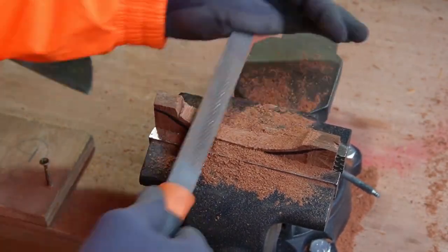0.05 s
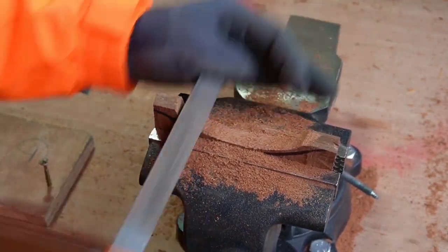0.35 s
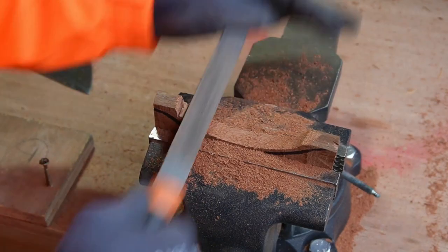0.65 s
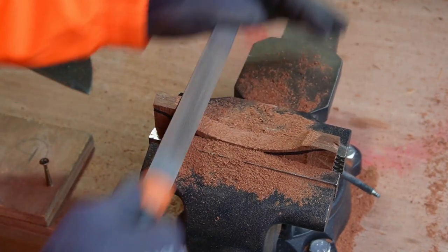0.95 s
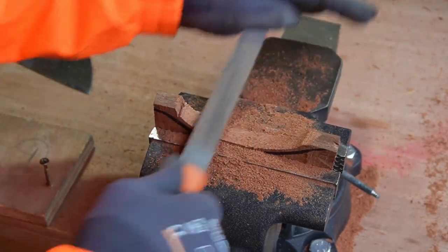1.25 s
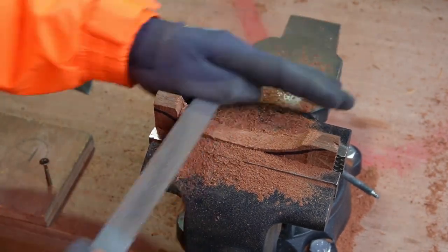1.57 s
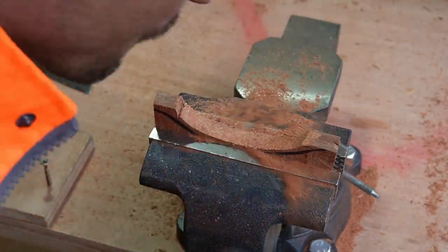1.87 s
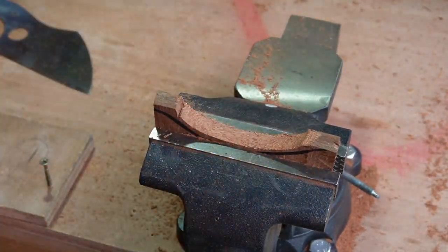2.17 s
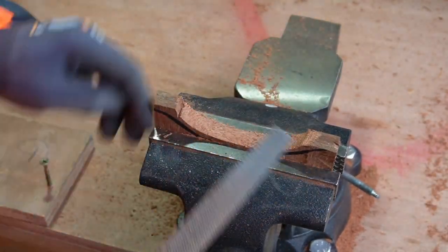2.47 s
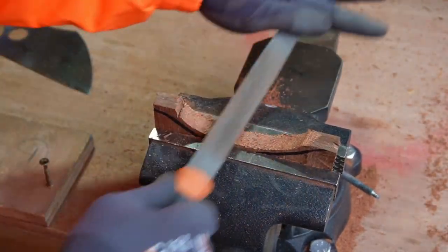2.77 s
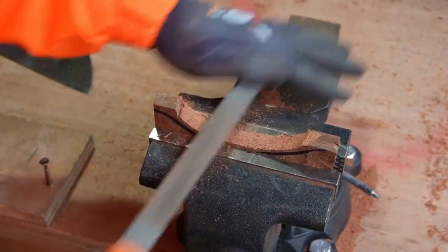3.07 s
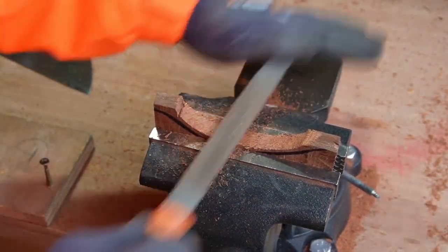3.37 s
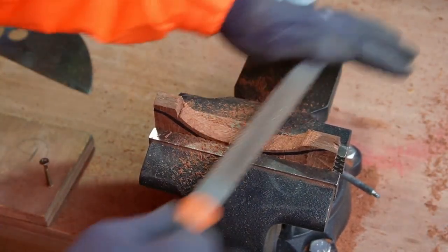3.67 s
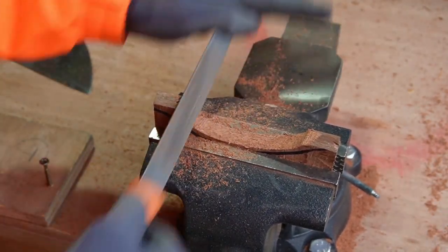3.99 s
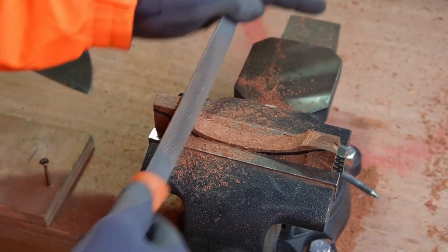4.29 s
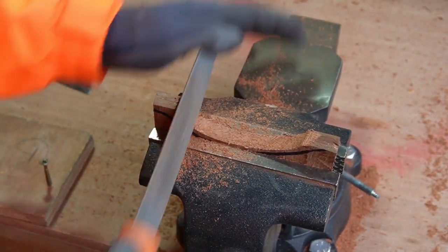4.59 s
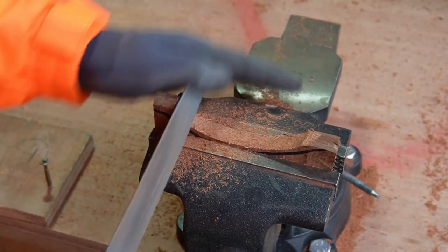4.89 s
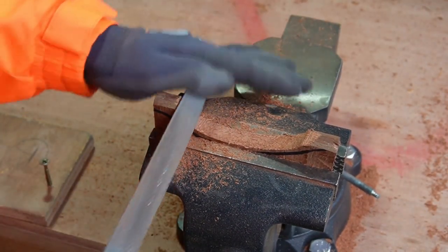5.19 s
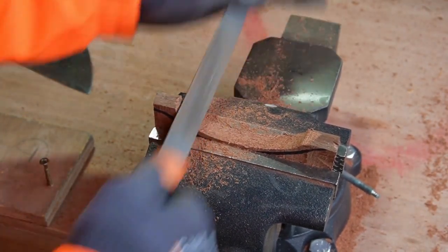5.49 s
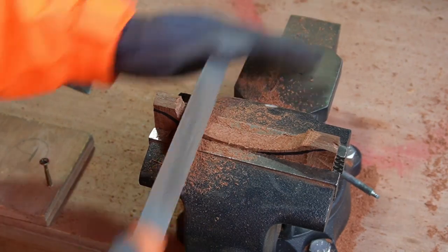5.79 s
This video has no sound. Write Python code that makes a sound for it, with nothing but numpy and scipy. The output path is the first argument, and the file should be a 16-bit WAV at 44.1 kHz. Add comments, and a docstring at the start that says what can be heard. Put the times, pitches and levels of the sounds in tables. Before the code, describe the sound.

A steel file rasps rapidly back and forth over a piece of wood clamped in a vise. The pushes are loud and bright, the draws softer and duller, with a faint metallic ring. The filing stops for about a second, while a hand brush softly sweeps the vise and sleeves rustle. Then the rasping resumes, lighter at first and soon at full strength. It is heard close up in a small, quiet workshop.

```python
"""A fast, dry rasp of a steel file, to and fro over a wooden handle clamped in a vise. Each stroke is a swell
of tooth clicks that rings file, wood and vise; pushes are loud and bright, draws softer and duller. The blade
sings faintly and the bench bumps under the worker's weight. In a pause a hand brush sweeps the dust off the
vise and clothes rustle; then the filing resumes. Behind it all lies the still air of a small workshop."""
import sys
import numpy as np
from scipy import signal
from scipy.fft import rfft, irfft
from scipy.io import wavfile
from scipy.ndimage import uniform_filter1d

SR = 44100
rng = np.random.default_rng(int(sys.argv[2]) if len(sys.argv) > 2 else 0)


def digitize_waveform(pressure):
    """Quantize a signal to 16-bit integers and store it at the path in sys.argv[1].

    Rows of a 2-D input are taken as channels; values are limited to [-1, 1].
    """
    field = np.atleast_2d(pressure).T
    bounded = np.clip(field, -1, 1)
    quanta = np.round(bounded * 32767).astype(np.int16)
    wavfile.write(sys.argv[1], SR, quanta)


N = 266805
TIME = np.arange(N) / SR
STROKE_SAMPLES = 8192
STROKE_HZ = np.arange(STROKE_SAMPLES // 2 + 1) * SR / STROKE_SAMPLES + 1e-3

# runs of filing at an even tempo: first_push_s, last_push_s, push_count
FILING_RUNS = [(.008, 1.147, 14), (1.297, 1.649, 5), (2.699, 2.988, 4), (3.077, 3.686, 8), (3.78, 4.406, 8),
               (4.502, 5.182, 8), (5.276, 5.632, 5), (5.719, 6.064, 5)]
# effort of the arm: time_s, push_db, draw_db
ARM_EFFORT = [(0, -23.5, -35.5), (.6, -24.5, -34.5), (.94, -23, -34.5), (1.08, -21.5, -29),
              (1.15, -32.5, -30.5), (1.3, -26.8, -36.5), (1.52, -26, -36.5), (1.649, -30, -45),
              (2.7, -32, -40.5), (2.94, -30.7, -37), (3.25, -34, -45), (3.7, -39, -46),
              (3.81, -27.5, -33.5), (4.35, -22.5, -29), (4.85, -23.5, -26), (5.22, -21, -26),
              (5.32, -22, -36), (5.971, -22, -30.5), (6.04, -56, -42.5)]
# strokes that dig in or skid: time_s, extra_level_db, extra_knock_db
STROKE_ACCENTS = [(.18, -5, 0), (.36, -4.5, -1.5), (.533, -1.5, 5.5), (.757, 1.5, 6.5), (.8, -4, 1.5),
                  (.885, 0, -4.5), (1.02, 4.5, -4), (2.7, 0.5, -9), (3.34, -5.5, 5), (3.39, -7, 0),
                  (3.83, 5, 1.5), (4.23, 2, -2), (4.6, -1.5, -2), (4.32, -1.5, 13.5), (4.37, -2, 8),
                  (4.79, 4, -2), (4.985, 0, 0.5), (5.275, -5, 1), (5.455, -3, -5), (5.72, -3.5, -1.5),
                  (5.805, 0.5, 0.5), (5.935, -5.5, -1)]
# bite of the teeth as the file changes angle: time_s, sizzle_db, dust_hiss_db, ring_db, ring_hz
TOOTH_BITE = [(0, -1, 2.5, 3, 1300), (.45, 1, 0.9, 2, 1325), (1.1, -1.2, 2, 2.5, 1350),
              (1.3, 4, -2, 1, 1330), (1.65, 2, 4, 1.5, 1516), (2.719, 4, 2.5, -7.5, 1640),
              (2.95, 1.5, 1.5, -0.5, 1630), (3.35, 6, 7, -2, 1590), (3.68, 2.7, 5.5, -2.5, 1740),
              (3.87, -2, 3.5, 4.5, 1310), (4.2, -2, 1, 6.5, 1330), (4.7, -4, 0, 4, 1386),
              (5.05, -1, -0.3, 0.5, 1520), (5.25, -3, 0.5, 1.5, 1250), (5.68, -0.5, -3, -2.5, 1210),
              (6.0, 0.5, -2, 1.5, 1380)]
# broad colour of teeth tearing wood: frequency_hz, level_db
RASP_COLOUR = [(50, -38.5), (130, -27.5), (250, -28.5), (400, -24), (640, -17), (1000, -3.5), (1900, -11.5),
               (3200, -1), (4400, 0), (5500, -8.5), (7000, -9), (9500, -15.5), (12000, -25), (15000, -35)]
# resonances of handle, vise and file: pitch_hz, width_hz, peak_db
WORK_MODES = [(361.5, 46, 18.5), (494.5, 25, 12.5), (934, 22, 6.5), (1054, 21, 5), (1187, 25, 5),
              (1316.4, 37.5, 17.5), (1581, 63, 11), (1756, 43, 6.5), (1866, 230, 9), (2080, 58, 5),
              (2224, 49, 9.5), (2395, 173, 4.5), (2625, 80, 16), (2859, 54, 12), (3152, 41, 6),
              (3580, 24, 1), (4102, 130, 3.5), (4258, 40, 6.5), (4580, 180, 5.5), (5000, 400, 4),
              (5880, 91, 6.5), (6300, 78, 11), (6630, 54, 12), (7314, 75, 5)]
# phase scatter between the ears: frequency_hz, scatter_rad
STEREO_SCATTER = [(140, 1.12), (280, 2.59), (2000, 4.12), (10000, 4.15)]
# how freely the grip lets the blade sing, relative to the strokes: time_s, ring_db
BLADE_SUSTAIN = [(.2, -20), (.4, -1), (.6, -46), (.95, -5.5), (1.42, -12), (1.64, -31), (2.67, -31),
                 (2.8, -1.5), (3.1, -13.5), (3.45, -3), (3.7, -32), (3.97, -4), (4.25, -25), (4.48, -8),
                 (4.8, -5.5), (5.15, -33), (5.62, -5.5), (6, -15)]
# two sweeps of the brush: peak_s, half_width_s, level_db
BRUSH_SWEEPS = [(1.985, 0.027, -48), (2.137, 0.017, -47.5)]
# colour of the bristle hiss: frequency_hz, level_db
BRISTLE_COLOUR = [(120, -77), (200, -45), (345, -37), (783, -14), (1210, -23), (1680, -5), (2210, -9),
                  (3070, -3), (3890, -6), (4410, -4.5), (6830, -13), (8820, -15), (15500, -33)]
# hollow note of the bristles in the long sweep: time_s, pitch_hz, level_db
HOLLOW_NOTE = [(1.9, 560, -100), (1.94, 625, -70), (1.965, 788, -55.5), (1.985, 772, -68),
               (2.005, 690, -67), (2.03, 600, -83)]
# swell of the bristles first grazing the vise, and of the file's faint steel ring: time_s, level_db
GRAZE_SWELL = [(1.82, -95), (1.845, -67.5), (1.91, -65.5), (1.96, -60.5), (1.995, -53), (2.03, -86),
               (2.07, -103)]
# faint ring of the file's steel as it slides and is laid down: pitch_hz, level_db
STEEL_MODES = [(1750, -12), (2760, 0.5), (3040, -5), (5235, -3.5)]
# bumps of the bench: peak_s, level_db
BENCH_BUMPS = [(.77, -80), (.848, -73), (1.3, -79), (2.765, -74), (3.92, -76), (4.1, -71), (4.15, -73),
               (4.68, -83), (4.842, -76), (4.94, -78), (5.63, -70), (5.987, -84)]
# dull colour of those bumps: frequency_hz, level_db
BENCH_COLOUR = [(20, -24.5), (55, -16), (85, -4), (140, 5.5), (220, -3.5), (400, -30.0), (1000, -81.0)]
# sleeves and gloves moving, the last swell blending into the first draw of the new run: peak_s, half_width_s,
# level_db
CLOTH_MOVES = [(1.68, 0.079, -63), (1.92, 0.12, -69.5), (2.26, 0.11, -74), (2.41, .018, -85.5),
               (2.56, 0.03, -63), (2.645, 0.044, -67)]
# colour of rubbing cloth: frequency_hz, level_db
CLOTH_COLOUR = [(47, -58), (80, -23.5), (152, -19), (197, -25), (230, -16.5), (436, -17), (1030, -14.5),
                (2970, 2), (7490, -7), (13000, -24), (15500, -12)]
# room tone of the still workshop: frequency_hz, level_db
AIR_COLOUR = [(25, -19), (100, -22.5), (300, -6), (800, -4), (1400, -3), (2100, -5), (6400, -15.5),
              (15500, -17.5)]

PUSH_SPREAD_S, DRAW_SPREAD_S = 0.0071, 0.008   # scale of a stroke's swell at the usual level
USUAL_DB, SHORTENING_PER_DB = -29, 0.0122   # harder strokes are shorter
UNEVEN_DB, UNEVEN_PITCH = 0.1, .012   # chance variation from stroke to stroke
DRAW_RING_DB, DRAW_RING_HZ, DRAW_DUST_DB = 1.5, 45.3, -1.8   # a draw rings more, higher, with less dust
PUSH_KNOCK_DB, DRAW_KNOCK_DB, KNOCK_PER_DB = -3.5, 2, 0.35   # the knock varies less than the stroke


def filing(strokes, ring_delay_s=.0006, ring_lag=.3, gain_db=-0.45):
    """The rasp: the teeth of every stroke ring the same clamped handle, vise and file."""
    modes = np.prod([resonance(*mode) for mode in WORK_MODES], axis=0)
    work = from_db(at_hz(RASP_COLOUR, STROKE_HZ)) * modes
    out = np.zeros((2, N))
    for time_s, spread_s, level_db, *contact in strokes:
        body = work * contact_colour(time_s, *contact)
        tight_phase = ring_lag * np.unwrap(np.angle(body))   # keeps the ring close to the stroke
        body = np.abs(body) * np.exp(1j * tight_phase)
        stroke = widen(ripple_colour(teeth(spread_s)) * body)
        duty = np.sqrt(2 * np.pi) * spread_s * SR / STROKE_SAMPLES   # sets the level at the crest
        start = round((time_s - ring_delay_s) * SR) - STROKE_SAMPLES // 4
        add(out, from_db(level_db + gain_db) * np.sqrt(duty) * rms_one(stroke), start)
    return out


def to_and_fro(draw_lead_cycles=.475, rest_s=.125, set_down_db=-16):
    """The arm swings evenly through each run, draw then push; after a rest the first draw barely bites."""
    strokes, previous_s = [], 0
    for first_s, last_s, count in FILING_RUNS:
        pushes, cycle_s = np.linspace(first_s, last_s, round(count), retstep=True)
        for push_s in pushes:
            rested = push_s - previous_s > rest_s
            strokes.append(stroke_at(push_s - draw_lead_cycles * cycle_s, True, rested * set_down_db))
            strokes.append(stroke_at(push_s, False))
            previous_s = push_s
    return strokes


def stroke_at(time_s, is_draw, lighter_db=0, accent_reach_s=.02):
    """The arm's effort and the file's angle set the length, weight and tone of one stroke."""
    times, push_db, draw_db = np.transpose(ARM_EFFORT)
    effort_db = np.interp(time_s, times, draw_db if is_draw else push_db)
    accents = (extra for at_s, *extra in STROKE_ACCENTS if abs(at_s - time_s) < accent_reach_s)
    accent_db, bump_db = next(accents, (0, 0))
    level_db = effort_db + accent_db + UNEVEN_DB * rng.standard_normal()
    harder_db = level_db - USUAL_DB
    spread_s = (DRAW_SPREAD_S if is_draw else PUSH_SPREAD_S) * np.exp(-SHORTENING_PER_DB * harder_db)
    times, _, _, ring_levels, ring_pitches = np.transpose(TOOTH_BITE)
    ring_db = np.interp(time_s, times, ring_levels) + is_draw * DRAW_RING_DB
    ring_hz = np.interp(time_s, times, ring_pitches) + is_draw * DRAW_RING_HZ
    ring_hz *= np.exp(UNEVEN_PITCH * rng.standard_normal())
    knock_db = (DRAW_KNOCK_DB if is_draw else PUSH_KNOCK_DB) - KNOCK_PER_DB * harder_db + bump_db
    return time_s, spread_s, level_db + lighter_db, ring_db, ring_hz, knock_db, is_draw * DRAW_DUST_DB


def teeth(spread_s, catches_per_s=4500, size_db=4.0, friction=0.83, stretch=0.94, shape=1.85,
          drag=.06, drag_s=.028):
    """Force of one stroke: teeth catch and tear fibres, most densely where the file is fastest."""
    t = (np.arange(STROKE_SAMPLES) - STROKE_SAMPLES // 4) / SR
    speed = np.exp(-np.abs(t / (2 * stretch * spread_s)) ** shape)
    speed += drag * np.exp(-(t / drag_s) ** 2)   # a light scrape carries through the turn
    caught = rng.random(len(t)) < catches_per_s * speed / SR
    sizes = from_db(size_db * np.minimum(rng.exponential(1, len(t)), 4))
    clicks = caught * sizes * rng.choice([-1, 1], len(t))
    tearing = rms_one(clicks * np.sqrt(speed))
    rubbing = rms_one(rng.standard_normal(len(t)) * speed)
    return tearing + friction * rubbing


def ripple_colour(force, even_hz=380, ripple_db=3.0, ripple_hz=110):
    """A stroke's spectrum, evened out and randomly rippled, so each has a slightly different colour."""
    spectrum = rfft(force)
    even_bins = round(even_hz * STROKE_SAMPLES / SR)
    broad_power = uniform_filter1d(np.abs(spectrum) ** 2, even_bins, mode="reflect")
    return spectrum / np.sqrt(broad_power + 1e-9) * from_db(ripple_db * wander(STROKE_HZ / ripple_hz))


def contact_colour(time_s, ring_db, ring_hz, knock_db, more_dust_db, dust_tilt=1.4):
    """Pressure and place of contact balance low knock, mid ring and top sizzle, and tune the main ring."""
    times, sizzle, dust, _, _ = np.transpose(TOOTH_BITE)
    sizzle_db = np.interp(time_s, times, sizzle)
    dust_db = np.interp(time_s, times, dust) + more_dust_db
    low = [(550, knock_db), (800, 0.0074), (1150, ring_db), (1800, ring_db), (2300, 0.0076)]
    high = [(4900, 0), (5800, sizzle_db), (7000, sizzle_db),
            (9000, dust_db), (13000, dust_db * dust_tilt)]
    return from_db(at_hz(low + high, STROKE_HZ)) * resonance(ring_hz, width_hz=250, peak_db=8)


def widen(spectrum, patch_hz=420):
    """Both ears get the same colour, but out of step patch by patch: a wide, diffuse image."""
    phase = np.pi + at_hz(STEREO_SCATTER, STROKE_HZ) * wander(STROKE_HZ / patch_hz)
    return irfft(spectrum * np.exp(.5j * phase * np.array([[1], [-1]])), STROKE_SAMPLES)


def blade(strokes, pitch_hz=1170, fade_s=0.016, slip_rad=0.9, slips_per_s=22, gain_db=-0.5):
    """The blade's clear ring: every stroke pumps it anew, while its phase drifts at each ear."""
    drive = np.zeros(N)
    for time_s, spread_s, level_db, *_ in strokes:
        first = max(round((time_s - spread_s) * SR), 0)
        last = max(round((time_s + spread_s) * SR), 0)
        drive[first:last] = from_db(level_db)
    decay = np.exp(-1 / (fade_s * SR))
    envelope = signal.lfilter([1 - decay], [1, -decay], drive + 1e-9)
    slips = np.array([wander(TIME * slips_per_s), wander(TIME * slips_per_s)])
    phase = 2 * np.pi * pitch_hz * TIME + slip_rad * slips + np.array([[0], [np.pi / 2]])
    freedom = from_db(np.interp(TIME, *np.transpose(BLADE_SUSTAIN)) + gain_db)
    return freedom * envelope * rms_one(np.sin(phase))


def brush(width_hz=35, flick_db=1.0, flicks_per_s=400, graze_hiss_db=4.0):
    """Bristles hiss over the vise while the file rings faintly as it slides and is laid down; the bristles'
    hollow note rises and falls with the sweep."""
    graze = level_curve(GRAZE_SWELL)
    sweep = swells(BRUSH_SWEEPS) + from_db(graze_hiss_db) * graze
    hiss = sweep * coloured_noise(BRISTLE_COLOUR) * from_db(flick_db * wander(TIME * flicks_per_s))
    times, note_hz, _ = np.transpose(HOLLOW_NOTE)
    note = level_curve(HOLLOW_NOTE) * friction_tone(np.interp(TIME, times, note_hz), width_hz)
    steel = graze * sum(from_db(db) * friction_tone(hz, width_hz) for hz, db in STEEL_MODES)
    return hiss + note + steel


def friction_tone(pitch_hz, width_hz):
    """A narrow resonance driven by friction: a stereo tone of unsteady strength and phase, rms 1."""
    carrier = np.exp(2j * np.pi * np.cumsum(pitch_hz * np.ones(N)) / SR)
    blur = signal.sosfilt(signal.butter(2, width_hz, fs=SR, output="sos"), rng.standard_normal((2, 2, N)))
    return rms_one(((blur[0] + 1j * blur[1]) * carrier).real)


def bench(half_width_s=0.032, gain_db=-2):
    """The heavy bench gives short, low bumps as the file is leaned on."""
    bumps = swells([(peak_s, half_width_s, db + gain_db) for peak_s, db in BENCH_BUMPS])
    return bumps * coloured_noise(BENCH_COLOUR)


def clothes():
    """Sleeves and gloves rub in soft swells during the pause."""
    return swells(CLOTH_MOVES) * coloured_noise(CLOTH_COLOUR)


def workshop(sound, t60_s=0.15, wet_db=-24, wall_cut_hz=7000):
    """The small room adds a faint, short and slightly dull tail, different at each ear."""
    t = TIME[:SR // 2]
    walls = signal.butter(1, wall_cut_hz, fs=SR, output="sos")
    tail = signal.sosfilt(walls, rng.standard_normal((2, len(t))))
    tail = rms_one(tail * np.exp(-np.log(1000) * t / t60_s)) / np.sqrt(len(t))
    return sound + from_db(wet_db) * signal.fftconvolve(sound, tail, axes=1)[:, :N]


def room_tone(level_db=-82.5):
    """The still air of the workshop: a steady, barely audible bed."""
    return from_db(level_db) * coloured_noise(AIR_COLOUR)


def from_db(db):
    return 10 ** (np.asarray(db) / 20)


def rms_one(x):
    return x / np.sqrt(np.mean(x ** 2) + 1e-20)


def at_hz(points, hz):
    """Read a table on a log-frequency axis."""
    knots, values = np.transpose(points)
    return np.interp(np.log(hz + 1e-9), np.log(knots), values)


def level_curve(rows):
    """A fader ride from a table's first and last columns; silent outside its times."""
    times, *_, levels_db = np.transpose(rows)
    return from_db(np.interp(TIME, times, levels_db)) * (TIME > times[0]) * (TIME < times[-1])


def swells(rows):
    """An envelope of bell-shaped swells."""
    return sum(from_db(db) * np.exp(-((TIME - peak_s) / half_width_s) ** 2)
               for peak_s, half_width_s, db in rows)


def resonance(pitch_hz, width_hz, peak_db):
    """Response of a ringing peak that stands above a flat surround."""
    detuning = (STROKE_HZ / pitch_hz - pitch_hz / STROKE_HZ) * pitch_hz / width_hz
    return 1 + (from_db(peak_db) - 1) / (1 + 1j * detuning)


def coloured_noise(colour):
    """Diffuse stereo noise of a given colour, rms 1."""
    white = rfft(rng.standard_normal((2, N)))
    bin_hz = np.arange(N // 2 + 1) * SR / N
    return rms_one(irfft(white * from_db(at_hz(colour, bin_hz)), N))


def wander(position):
    """Random drift of spread about 1, with a new target at each unit of position."""
    knots = rng.standard_normal(1024)
    return np.interp(position, np.arange(len(knots)), knots)


def add(out, sound, start):
    """Mix a sound in from a given sample on."""
    first, last = max(start, 0), min(start + sound.shape[1], N)
    out[:, first:last] += sound[:, first - start:last - start]


def scene(right_db=0.22):
    """File, brush, bench and clothes up close, a hair to the right, over the room tone."""
    strokes = to_and_fro()
    close = workshop(filing(strokes)) + blade(strokes) + brush() + bench() + clothes()
    return close * from_db([[-right_db], [right_db]]) + room_tone()


def record(dry, cutoff_hz=15600):
    """A steep high cut takes off the very top."""
    return signal.sosfilt(signal.ellip(10, .1, 80, cutoff_hz, fs=SR, output="sos"), dry)


dry = scene()
out = record(dry)
digitize_waveform(out)
```